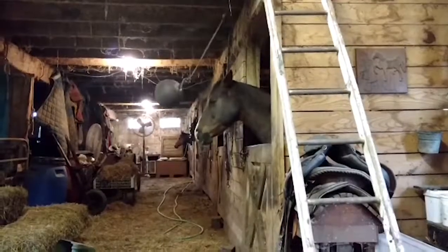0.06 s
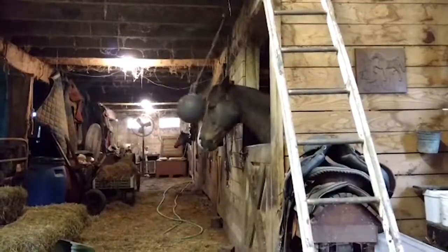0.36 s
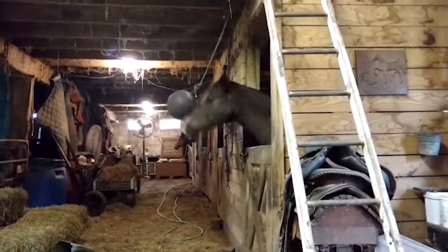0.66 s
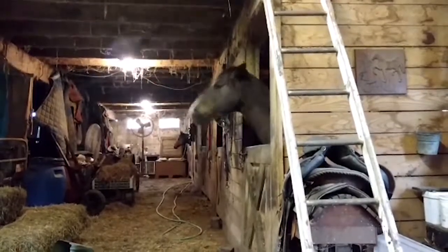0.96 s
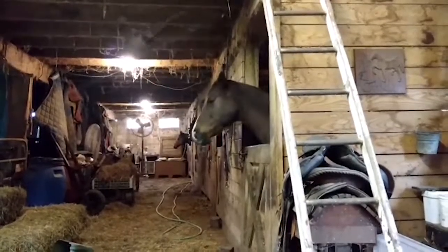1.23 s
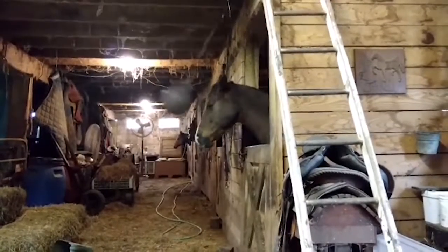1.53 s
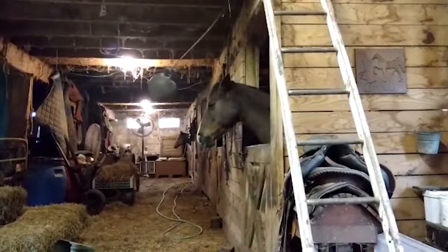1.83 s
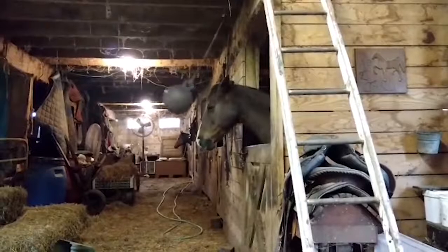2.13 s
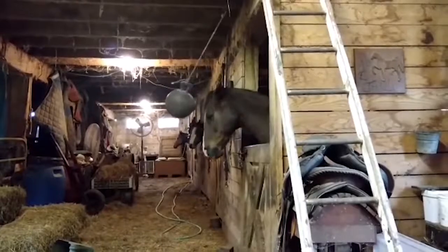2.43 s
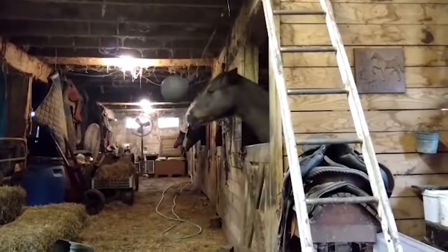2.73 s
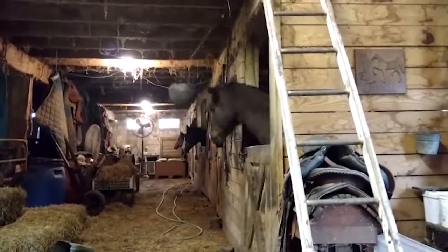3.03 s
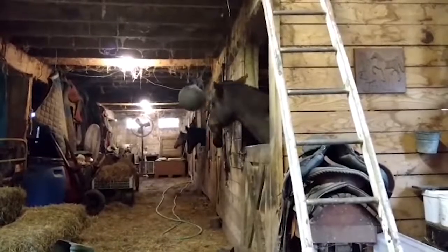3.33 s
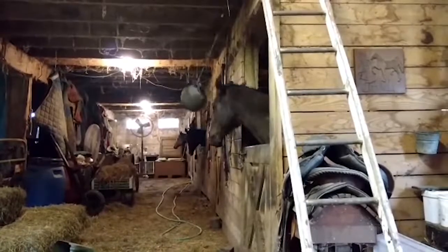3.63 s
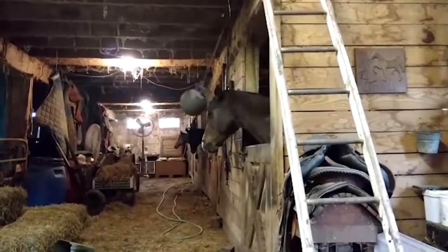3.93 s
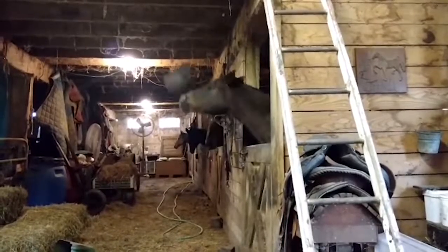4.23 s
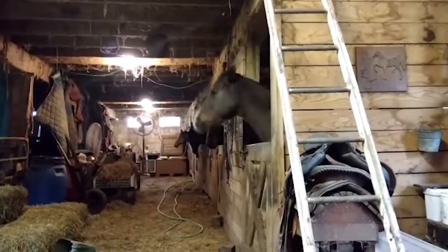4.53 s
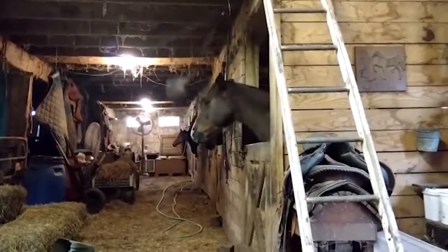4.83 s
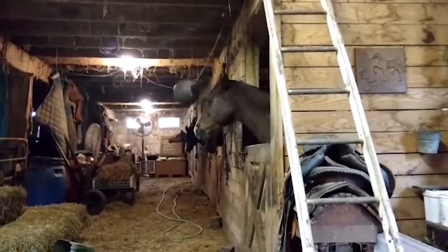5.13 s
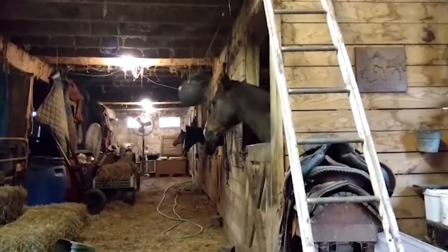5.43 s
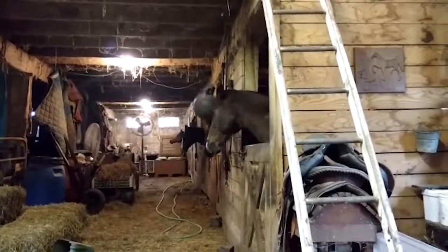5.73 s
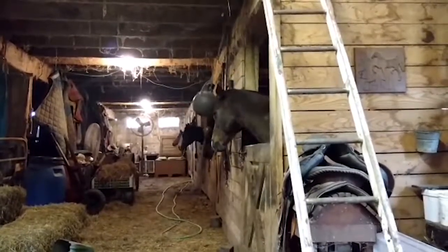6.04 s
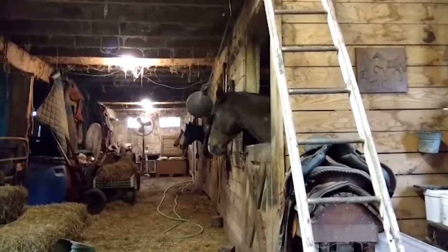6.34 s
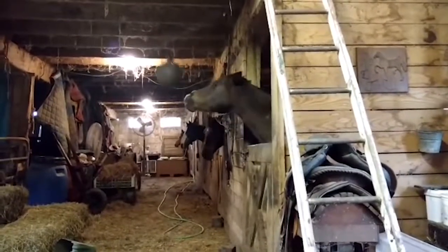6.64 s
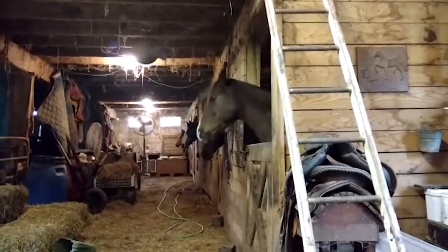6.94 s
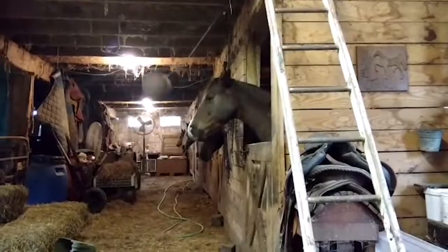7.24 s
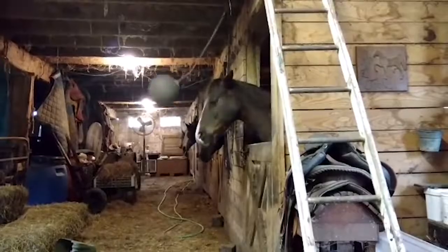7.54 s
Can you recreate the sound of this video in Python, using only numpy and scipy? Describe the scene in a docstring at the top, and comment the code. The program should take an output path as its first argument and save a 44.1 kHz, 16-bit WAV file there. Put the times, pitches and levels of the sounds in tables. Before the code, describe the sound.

Heard on a close stereo pair in the aisle of a wooden barn, uneven knocks ring briefly overhead as a horse swings a hanging ball. After the first few comes a short, loud scuffle of scraping, groaning boards to the right, with a faint metal jingle. More knocks follow, spaced apart, with low hoof steps, halter rubbing, light clacks and crackling straw between them. Soft air noise and a faint hay rustle run underneath.

```python
"""A ball on a ceiling rope, butted by a horse in a wooden barn: the fastening knocks as it swings.
In one loud scuffle the stall boards, off to the right, scrape, crack and groan as the wood sticks
and slips, and the rope's metal clip jingles. Hoof steps and booms after the knocks thud dully, rope
and halter rub, straw snaps, and rope, wood or hoof gives short creaks and clacks.
Heard from the aisle on a close pair of microphones, over a low rush of air."""
import sys
import numpy as np
from scipy import signal
from scipy.fft import rfft, irfft, next_fast_len
from scipy.io import wavfile
from scipy.ndimage import uniform_filter1d

SR = 44100
rng = np.random.default_rng(int(sys.argv[2]) if len(sys.argv) > 2 else 0)


def transcribe(u):
    """Save the signal u as a 16-bit wav file named by the first command-line argument.

    u: samples, shape (n,) or (channels, n), limited to [-1, 1]; the rate is SR.
    q: integer samples, one column per channel.
    """
    v = np.clip(np.atleast_2d(u).T, -1, 1)
    q = np.round(v * 32767).astype(np.int16)
    wavfile.write(sys.argv[1], SR, q)


N = 334278

# knocks overhead, and at 1.3 s a faint sharp knock that opens the scuffle: t/s, direct peak/dB, hardness as a
# corner f/Hz, relative ceiling ring/dB
KNOCKS = [(0.4850, -27, 1750, -10), (0.7725, -16.5, 3230, -4), (1.3, -40, 1500, 0), (1.679, -15, 2630, 0.5),
          (2.4010, -24, 1930, -1.5), (2.8088, -26, 1540, -8.5), (3.4167, -26, 1360, 2),
          (4.0528, -29.5, 1180, 2), (4.471, -14, 4340, 1), (5.355, -12.5, 3630, -10),
          (6.0804, -24, 1740, -2.5), (6.9143, -23, 1430, -2)]
# spectrum of a knock before the contact softens it: f/Hz, level/dB
KNOCK_COLOUR = [(60, -2), (200, -10), (400, 8), (600, 9), (900, 4.5), (1300, 5.5), (1900, -2), (3300, -12),
                (4200, -15.5), (5500, -28), (10000, -45), (16000, -47)]
# reflections off nearby beams and walls: delay/s, gain
ECHOES = [(.0025, 0.46), (.0041, 0.18), (.0092, .14), (0.0172, 0.13)]
# modes of the ceiling: f/Hz, level/dB, t60/s
CEILING_MODES = [(372, -8, 0.55), (485, 0, 0.45), (503, 5, 0.29), (545, -5, 0.81), (592, -1, 0.26),
                 (684, -2.5, 0.53), (945, 1, 0.29), (1380, -11, 0.27), (1700, -44, 0.18), (1750, -1, 0.073),
                 (3230, -14.5, 0.15), (4240, -32, 0.14)]

def fastening_knocks(size=4096):
    """Overhead the fastening slips and hits home: a sharp push, near echoes, then barn and ceiling."""
    out, hz = np.zeros((2, N)), bins(size)
    for s, db, hard_hz, ring_db in KNOCKS:
        treble_cut = (1 + (hz / hard_hz) ** 4) ** -.5
        bass_cut = (hz + 20) / np.hypot(hz + 20, 0.5 * hard_hz)  # a harder contact carries less bass
        log_gain = np.log(from_db(read(KNOCK_COLOUR, hz)) * treble_cut * bass_cut)
        mirrored = np.r_[log_gain, log_gain[-2:0:-1]]
        push = -np.fft.ifft(np.exp(np.conj(signal.hilbert(mirrored)))).real  # causal pulse
        push *= from_db(db) / abs(push).max()
        add(out, s, push)
        for delay, gain in ECHOES:
            add(out, s + delay, gain * push)
        # for its energy, a softer knock stirs the barn more
        stir = np.linalg.norm(push) * from_db(-2 - 3 * np.log2(hard_hz / 2000))
        tail = shaped(barn_tail(), lambda f: 1 / np.hypot(1, f / (0.64 * hard_hz)))
        add(out, s, stir * from_db(5) * tail)
        add(out, s, stir * from_db(ring_db) * ring(CEILING_MODES))
    return out


# modes of the stall boards: f/Hz, width/Hz, level/dB
BOARD_MODES = [(222, 6.5, -11), (252.6, 4.6, -0.5), (389, 13, 3), (418, 15, -2), (504, 32, 4),
               (540, 12, -6), (636, 29, 1), (655, 33, -1), (690, 9.2, 3), (771, 22, -3.5), (957, 39, -4.5),
               (1393, 25, -5), (1600, 19, -19), (1720, 75, -16), (1896, 140, -17)]
# dense wooden body under the modes: f/Hz, level/dB
BOARD_BODY = [(60, -52), (180, -21.5), (300, -13), (500, -5), (900, -9), (1200, -11.5), (1500, -20),
              (2000, -41), (3000, -25.5), (6000, -101), (15000, -66)]
# the stall as the microphones hear it, mostly on the right: f/Hz, left minus right/dB
STALL_SIDE = [(100, 6), (250, -6), (400, -2), (560, -7), (800, -12.5), (1200, 3), (15000, -6)]

def boards(drive):
    """The stall boards ring with whatever drives them, at a steady level."""
    def response(hz):
        modes = sum(from_db(db) ** 2 / (1 + ((hz - f) / (width / 2)) ** 2) ** 2
                    for f, width, db in BOARD_MODES)
        pan = from_db(read(STALL_SIDE, hz) * np.array([[.5], [-.5]]))
        return np.sqrt(modes + from_db(read(BOARD_BODY, hz)) ** 2) * pan
    return steadied(unit(shaped(drive, response)), 0.013)


# shoves along the stall: t/s, rise/s, hold/s, scrape level/dB, grit level/dB
SHOVES = [(1.307, 0.0012, 0.072, -33, -63), (1.421, 0.0086, 0.081, -31.5, -61),
          (1.741, 0.028, 0.22, -33, -64), (1.924, 0.0084, 0.019, -29.5, -38.5)]
# hiss of the grit: f/Hz, level/dB
GRIT_COLOUR = [(400, -20), (1000, 0), (1800, -3), (3300, 16.5), (4500, 10.5), (6500, 2), (8000, -8),
               (8800, 8), (10500, -12), (13000, -12), (15000, -26)]
# blows on the stall: t/s, board level/dB, crack level/dB
BLOWS = [(1.2983, -31, -40.5), (1.325, -31.5, -33), (1.347, -41, -55), (1.402, -34, -45), (1.43, -27, -35),
         (1.486, -33, -42), (1.505, -32, -40), (1.611, -37, -55), (1.704, -32.5, -52), (1.761, -34, -36.5),
         (1.785, -38, -47), (1.837, -37, -40.5), (1.858, -41, -50), (1.871, -29.5, -32), (1.907, -28, -41),
         (1.98, -36, -40)]
# rise and fall of the scuffle's low range: t/s, gain/dB
BOARD_LOWS = [(1.3, 0), (1.52, 5.5), (1.58, -2.5), (1.79, -2.5), (1.88, -2), (1.95, -0.5), (2.0, 1.5)]

def scuffle(scrape_t60=0.73, grit_t60=0.36, lows_below_hz=470):
    """Shoves scrape the boards in small slips over hissing grit; blows land with a dry crack of wood."""
    t = np.arange(N) / SR
    scrape_power, grit_power = np.zeros((2, N))
    for s, rise, hold, scrape_db, grit_db in SHOVES:
        scrape_power += (from_db(scrape_db) * held(t - s, rise, hold, scrape_t60)) ** 2
        grit_power += (from_db(grit_db) * held(t - s, rise, hold, grit_t60)) ** 2
    scrape = boards(0.36 * slips(N, per_s=680, spread_db=1) + noise(N))
    grit = coloured(noise(N) + .5 * slips(N, per_s=2100, spread_db=6.5), GRIT_COLOUR)
    out = np.sqrt(scrape_power) * scrape + np.sqrt(grit_power) * grit
    for s, db, crack_db in BLOWS:
        add(out, s, struck(boards(noise(SR // 3, shared=0.55)), db, rise=0.0011, t60=0.15))
        crack = band(noise(SR // 8, shared=0.16), hz=1350, octaves=0.28)
        add(out, s, struck(steadied(crack, 0.0049), crack_db, rise=0.0011, t60=0.055))
    lows = shaped(out, lambda hz: 1 / (1 + (hz / lows_below_hz) ** 20))
    lows_gain = from_db(np.interp(t, *np.transpose(BOARD_LOWS)))
    return out + lows * (lows_gain - 1)


# groans under the shoves: t/s, length/s, first level/dB, last level/dB, f/Hz, relative lower mode/dB
GROANS = [(1.329, 0.054, -25, -31, 538, -6.5), (1.431, 0.022, -22.5, -20, 557.5, -16),
          (1.462, 0.058, -24.5, -26, 549.6, -18), (1.53, 0.111, -31, -34, 549.6, -21),
          (1.758, 0.031, -26, -25, 565, -32), (1.797, 0.064, -23.5, -23.5, 550, -34),
          (1.857, 0.023, -20, -18, 550, -25), (1.887, 0.0079, -26, -24, 582, -15),
          (1.943, 0.071, -32.5, -31.5, 562.5, -6)]
# the groaning board stands hard right; rows left, right: direct gain/dB
GROAN_SIDE_DB = [
    [-40],
    [1.5],
]

def board_groan(low_mode_hz=410.2, throbs_per_s=27.6, hz_per_db=1.5, room_db=-13):
    """Two board modes sing in throbs as the wood sticks and slips; the upper sags as it weakens."""
    direct, size = np.zeros((1, N)), SR // 2
    t = np.arange(size) / SR
    throb_db = 3.5 * np.cos(2 * np.pi * throbs_per_s * (t - 0.0098))
    def sing(hz):
        wavering_hz = hz * (1 + 0.0368 * drift(size, 88))
        flutter = from_db(2.5 * np.tanh(drift(size, 150)))
        return np.sin(2 * np.pi * np.cumsum(wavering_hz) / SR) * flutter
    for s, length, first_db, last_db, hz, low_db in GROANS:
        db = np.interp(t, [0, length], [first_db, last_db]) + throb_db
        tone = sing(hz + hz_per_db * (db - first_db)) + from_db(low_db) * sing(low_mode_hz)
        envelope = from_db(db) * held(t, rise=0.0017, hold=length, t60=0.058)
        add(direct, s, envelope * steadied(tone[None], 0.024))
    room = signal.fftconvolve(direct, barn_tail(), axes=1)[:, :N]
    return from_db(GROAN_SIDE_DB) * direct + from_db(room_db) * unit(room) * direct.std()


# jerks on the rope's clip: t/s, level/dB, brightness/(dB per octave), relative rattle/dB
JERKS = [(1.315, -58, 4, 0), (1.327, -59, 6, 2), (1.356, -66, 13, 3), (1.933, -43, -12, 13),
         (1.953, -49, -0.5, 5)]
CLIP_MODES = [(3060, 6.5, 0.29), (3500, -2, 0.33), (3645, 2.5, 0.44), (3740, -11, 0.26), (4150, -3, 0.28),
              (4630, 9.5, 0.29), (5510, -13, 0.15), (6290, 3, 0.38), (6420, -6, 0.23), (8690, 0.5, 0.22),
              (9100, -14, 0.25), (10440, -4, 0.3), (11000, -25, 0.24), (12930, -19, 0.23)]

def metal_clip():
    out = np.zeros((2, N))
    for s, db, tilt_db, rattle_db in JERKS:
        jingle = ring(CLIP_MODES, tilt_db)
        jingle *= .6 + drift(jingle.shape[1], 190)
        add(out, s, from_db(db) * jingle / jingle[:, :SR // 50].std())
        contacts = noise(SR // 8, shared=0.48) + slips(SR // 8, per_s=850, spread_db=5.5)
        links = band(contacts, hz=4470 * 2 ** (tilt_db / 14), octaves=0.62)
        add(out, s, struck(unit(links), db + rattle_db, rise=0.0011, t60=0.051))
    return out


# hoof steps, and booms that follow the overhead knocks: t/s, level/dB, t60/s
THUDS = [(2.19, -45, 0.6), (2.813, -40.5, 0.13), (3.222, -41.5, 0.11), (3.431, -41.5, 0.44),
         (3.455, -38, 0.56), (3.983, -50.5, 0.56), (5.0, -51, 0.61), (5.356, -41, 0.18), (5.835, -46, 0.73),
         (5.904, -40, 0.089), (6.405, -47, 0.97), (6.99, -45, 0.63)]
# spectrum of a thud: f/Hz, level/dB
THUD_COLOUR = [(50, -42), (150, -5.5), (280, 5), (500, 1.5), (800, -4.5), (1400, -16.5), (2500, -28),
               (8000, -27), (15000, -53)]

def low_thuds(size=SR // 2, rise_s=0.0054):
    """Dull low thuds, each over a short deep note: hoof steps, and booms after the overhead knocks."""
    out = np.zeros((2, N))
    for s, db, t60 in THUDS:
        thud = steadied(coloured(noise(size, shared=0.6), THUD_COLOUR), 0.014)
        add(out, s, struck(thud, db, rise_s, t60))
        boom = unit(band(noise(size, shared=0.21), hz=97, octaves=0.065))
        add(out, s, struck(boom, db - 8.5, rise_s, t60=0.097))
    return out


# strokes of rope and halter: t/s, level/dB, hold/s, t60/s, rasp f/Hz
RUBS = [(1.326, -45, 0.003, 0.19, 1000), (1.429, -32, 0.003, 0.07, 1400), (1.928, -34, 0.003, 0.35, 1700),
        (3.54, -54, 0.003, 0.19, 1200), (4.007, -55, 0.05, 0.15, 900), (5.907, -52, 0.003, 0.085, 900),
        (7.325, -51, 0.016, 0.11, 935), (7.356, -50, 0.038, 0.3, 1170), (7.462, -53.5, 0.012, 0.19, 1400),
        (7.516, -46.5, 0.016, 0.11, 1200)]
# spectrum of the rubbing: f/Hz, level/dB
RUB_COLOUR = [(100, -3), (500, 13.5), (1200, 7.5), (1900, 9), (3400, -1.5), (5500, -8), (9000, -12),
              (15000, -44)]

def halter_rubs(size=SR // 2):
    """Rope and halter rub in grainy strokes, each rasping in one band."""
    out, t = np.zeros((2, N)), np.arange(size) / SR
    for s, db, hold, t60, hz in RUBS:
        grains = noise(size, shared=.3) + slips(size, per_s=350, spread_db=3)
        rasp = shaped(grains, lambda f: 1 + from_db(0.5) * bell(f, hz, octaves=0.31))
        add(out, s, from_db(db) * held(t, 0.0051, hold, t60) * coloured(rasp, RUB_COLOUR))
    return out


# small creaks and clacks in the barn: t/s, rough peak/dB, f/Hz, t60/s
CREAKS_AND_CLACKS = [(0.276, -52, 1860, 0.021), (2.129, -42, 3150, 0.02), (3.983, -41, 790, 0.036),
                     (4.445, -52, 3880, 0.016), (4.567, -50, 3570, 0.025), (4.666, -46.5, 2080, 0.036),
                     (5.071, -46, 2960, 0.028), (5.909, -44, 860, 0.03), (7.105, -48, 2850, 0.03),
                     (7.359, -42.5, 1160, 0.09), (7.467, -54, 3330, 0.03)]

def creaks_and_clacks():
    """Short narrow-band creaks and clacks of rope, wood or hoof."""
    out = np.zeros((2, N))
    for s, db, hz, t60 in CREAKS_AND_CLACKS:
        add(out, s, snap(db, hz, octaves=0.13, t60=t60, room_db=-18))
    return out


# loudest snaps of straw underfoot: t/s, rough peak/dB, centre f/Hz, t60/s
SNAPS = [(0.068, -49.5, 6500, 0.018), (1.511, -42, 4780, 0.031), (1.623, -41.5, 9400, 0.014),
         (1.69, -44.5, 8500, 0.033), (1.827, -47, 10000, 0.0083), (2.1285, -42, 4700, 0.013),
         (2.3258, -50, 5340, 0.016), (2.392, -42.5, 5840, 0.008), (2.996, -48, 4520, 0.018),
         (3.166, -48, 4200, 0.018), (3.197, -55, 4200, 0.015), (3.582, -48, 5100, 0.01),
         (3.7555, -48.5, 7500, 0.009), (3.879, -55, 6000, 0.013), (4.1195, -49, 8000, 0.016),
         (4.183, -47, 8500, 0.01), (4.258, -54, 7000, 0.014), (5.009, -46.5, 6000, 0.022),
         (5.027, -56, 6000, 0.012), (5.175, -57, 6000, 0.012), (5.211, -52, 6800, 0.017),
         (5.326, -50, 6000, 0.0076), (5.575, -46.5, 3620, 0.022), (5.743, -44.5, 7700, 0.015),
         (5.777, -47, 8060, 0.015), (6.362, -46.5, 7000, 0.014), (6.558, -45.5, 3570, 0.073),
         (6.926, -45.5, 7400, 0.025), (7.067, -50, 8000, 0.013), (7.3388, -46.5, 3780, 0.025),
         (7.445, -57, 5800, 0.018)]
# scuffs through the straw: t/s, level/dB, length/s, centre f/Hz
SCUFFS = [(0.735, -59, 0.018, 5000), (1.07, -67, 0.02, 4500), (2.405, -56, 0.026, 7750),
          (2.512, -55, 0.014, 5000), (2.82, -52.5, 0.023, 4850), (3.81, -56, 0.018, 7900),
          (4.737, -55, 0.011, 7500), (5.975, -56, 0.016, 4660), (6.435, -56, 0.027, 3880),
          (6.81, -63, 0.039, 6450)]

def straw(crackles=150, top_hz=11200):
    """On the stall floor stalks snap and slide over each other in tiny clicks, above a fine crackle."""
    out, t = np.zeros((2, N)), np.arange(SR // 4) / SR
    for s, db, hz, t60 in SNAPS:
        add(out, s + .001, snap(db, hz, octaves=0.86, t60=t60, room_db=-24))
    for s, db, length, hz in SCUFFS:
        grains = .6 * noise(len(t)) + slips(len(t), per_s=900, spread_db=3)
        envelope = from_db(db) * held(t, rise=0.005, hold=length, t60=0.12)
        add(out, s, envelope * unit(band(grains, hz, octaves=0.68)))
    for when, strength, pitch in rng.random((crackles, 3)):
        db, hz = -63 + 9 * strength ** 3, 3000 * 3.5 ** pitch
        add(out, when * N / SR, snap(db, hz, octaves=0.35, t60=0.016, room_db=-22))
    return shaped(out, lambda hz: 1 / np.hypot(1, (hz / top_hz) ** 4))


# spectrum of the hay: f/Hz, level/dB
RUSTLE_COLOUR = [(300, -10), (1800, -16), (3000, 19), (5200, 13), (6800, 12.5), (8500, 4.5), (10500, 7.5),
                 (12500, -16), (14000, -2), (15500, -15)]
# the horse stirs the hay: middle t/s, half length/s, gain/dB
STIRS = [(6.508, 0.23, 3), (7.42, 0.2, 5)]

def hay_rustle(base_db=-63, flicker_db=1.7):
    """Hay rustles unevenly, swelling where the horse stirs it."""
    grains = noise(N) + .55 * slips(N, per_s=400, spread_db=4)
    stir_db = sum(swell_db(*stir) for stir in STIRS)
    return coloured(grains, RUSTLE_COLOUR) * from_db(base_db + stir_db + flicker_db * drift(N, 4.2))


# air in the aisle, around the microphones: f/Hz, level/dB
AIR_COLOUR = [(20, -43), (45, -19.5), (65, -46), (90, -12.5), (130, 0), (180, 2), (250, -3.5), (310, -4),
              (370, -10), (490, -5), (900, -7.5), (1400, -12), (2000, -16), (3300, -38.5), (9000, -22.5),
              (12000, -33.5), (15500, -38)]
# the low draught: f/Hz, level/dB
DRAUGHT_COLOUR = [(20, -30), (45, -25), (65, -3), (100, 7.5), (130, 0.5), (200, -22), (500, -47)]

def aisle_air():
    """Air rushes softly through the barn; a low draught, stronger on the left, swells in one gust."""
    rush = coloured(noise(N), AIR_COLOUR) * from_db(-53 + .5 * drift(N, 5.9))
    draught = coloured(noise(N), DRAUGHT_COLOUR)
    draught_db = -67.5 + swell_db(middle_s=3, half_s=0.41, db=6.9) + 2.8 * drift(N, 8.3)
    side_db = np.array([[2.5], [-1.5]])
    return rush + draught * from_db(draught_db + side_db)


# tone of the barn's reverberation: f/Hz, level/dB
BARN_COLOUR = [(60, -22), (130, -12), (400, -9), (520, 4), (650, 0.5), (800, -5), (1000, -1), (1400, -10.5),
               (1900, -8.5), (3500, -16.5), (6000, -21), (15000, -28)]
# its decay: f/Hz, t60/s
BARN_DECAY = [(200, 0.7), (530, 0.56), (1400, 0.48), (3700, 0.44), (12000, 0.18)]

def barn_tail():
    """Diffuse reverberation of the wooden barn, of energy 1, the treble dying first."""
    hz, frame_s, spectra = signal.stft(noise(SR * 3 // 4, shared=0.35), SR, nperseg=256)
    decay = from_db(-60 * frame_s / read(BARN_DECAY, hz)[:, None])
    tail = signal.istft(spectra * decay, SR, nperseg=256)[1]
    t = np.arange(tail.shape[1]) / SR
    tail = coloured(tail, BARN_COLOUR) * (1 - np.exp(-(t / 0.0013) ** 2))
    return tail / np.sqrt((tail ** 2).sum() / 2)


def ring(modes, tilt_db=0, vary_db=2):
    """Dying modes of energy 1, tilted per octave, varying by blow and in phase at each microphone."""
    t, sound = np.arange(SR * 3 // 4) / SR, 0
    for hz, db, t60 in modes:
        cycles = hz * t + rng.random() + 0.31 * rng.random((2, 1))
        mode_db = db + tilt_db * np.log2(hz) + vary_db * rng.standard_normal()
        sound += struck(np.sin(2 * np.pi * cycles), mode_db, 0.0013, t60)
    return sound / np.sqrt((sound ** 2).sum() / 2)


def snap(db, hz, octaves, t60, room_db):
    """A brief burst around one pitch, with a faint tail; db is about its peak."""
    hiss = steadied(band(noise(SR // 3, shared=0.65), hz, octaves), 0.0033)
    burst = struck(hiss, 0, rise=0.00077, t60=t60)
    tail = struck(hiss, room_db, rise=0.0073, t60=0.41)
    rough_peak = 2 * burst.mean(0)[:SR // 200].std()
    return (burst + tail) * from_db(db) / rough_peak


def slips(size, per_s, spread_db):
    """Random small slips of uneven strength."""
    chance, strength = rng.random(size), np.minimum(rng.exponential(1, size), 4)
    return unit((chance < per_s / SR) * from_db(spread_db * strength) * rng.choice([-1, 1], size))


def noise(size, shared=0):
    """Two channels of noise with a common share of their power."""
    left, right, common = rng.standard_normal((3, size))
    return np.sqrt(1 - shared) * np.array([left, right]) + np.sqrt(shared) * common


def drift(size, hz):
    """Random wander of rms 1, mostly slower than hz."""
    return unit(shaped(rng.standard_normal(size), lambda f: np.exp(-(f / hz) ** 2)))


def swell_db(middle_s, half_s, db):
    """A bell-shaped rise and fall in level."""
    return db * np.exp(-((np.arange(N) / SR - middle_s) / half_s) ** 2)


def held(t, rise, hold, t60):
    """Gain of a stroke that starts at t = 0: a rise, a hold and an exponential release."""
    return (1 - np.exp(-np.maximum(t, 0) / rise)) * from_db(-60 * np.maximum(t - hold, 0) / t60)


def struck(x, db, rise, t60):
    """Gives x a quick rise and an exponential decay."""
    return x * from_db(db) * held(np.arange(x.shape[-1]) / SR, rise, 0, t60)


def steadied(x, seconds):
    """Holds the short-time rms at 1."""
    power = uniform_filter1d((x ** 2).mean(0), int(seconds * SR))
    return x / np.sqrt(abs(power) + 1e-12)


def shaped(x, gain):
    """Filters by a function from Hz to gain."""
    size = next_fast_len(x.shape[-1] + 2048)
    return irfft(rfft(x, size) * gain(bins(size)), size)[..., :x.shape[-1]]


def coloured(x, colour):
    """Filters by a table of f/Hz, level/dB, to rms 1."""
    return unit(shaped(x, lambda hz: from_db(read(colour, hz))))


def band(x, hz, octaves):
    """Keeps a bell-shaped band around hz."""
    return shaped(x, lambda f: bell(f, hz, octaves))


def bell(f, hz, octaves):
    """Gain of a bell-shaped band around hz."""
    return np.exp(-.5 * (np.log2((f + 1) / hz) / octaves) ** 2)


def bins(size):
    """Frequencies of a spectrum of this many samples."""
    return np.fft.rfftfreq(size, 1 / SR)


def read(points, hz):
    """Reads a table on a log-frequency axis."""
    f, value = np.transpose(points)
    return np.interp(np.log(hz + 1), np.log(f + 1), value)


def from_db(db):
    """Decibels to gain."""
    return 10 ** (np.asarray(db) / 20)


def unit(x):
    """Scales to rms 1."""
    return x / np.sqrt(np.mean(x ** 2) + 1e-20)


def add(mix, s, sound):
    """Mixes a sound in at time s."""
    part = mix[:, max(round(s * SR), 0):][:, :sound.shape[-1]]
    part += sound[..., :part.shape[1]]


def scene():
    """The barn from the aisle; the background starts softer and comes up within the first second."""
    events = fastening_knocks() + scuffle() + metal_clip() + board_groan()
    events += low_thuds() + halter_rubs() + creaks_and_clacks() + straw()
    t = np.arange(N) / SR
    fade_in = from_db(-4.5 * np.maximum(1 - (t / 0.71) ** 2, 0))
    return events + (aisle_air() + hay_rustle()) * fade_in


# stereo width of the microphone pair: f/Hz, side gain/dB
PAIR_WIDTH = [(40, 8), (90, 4.5), (180, -4), (500, -1), (1000, 0.5), (1500, 2.5), (4000, 3.5), (15000, 0)]
PAIR_NULL_HZ, BAND_LIMIT_HZ = 2472, 15800

def record(dry):
    """The close pair: each port subtracts the other, delayed, so mid and side get interleaved combs."""
    angle = lambda hz: np.pi * hz / PAIR_NULL_HZ
    leak = lambda hz: np.minimum(from_db(-27) * (hz / 6000) ** 4, .7)  # fills the nulls in the treble
    mid_comb = lambda hz: np.hypot(np.sin(np.maximum(angle(hz), np.pi / 2)), leak(hz))
    side_comb = lambda hz: np.hypot(np.cos(angle(hz)), leak(hz))
    mid = shaped((dry[0] + dry[1]) / 2, mid_comb)
    side = shaped((dry[0] - dry[1]) / 2, lambda hz: side_comb(hz) * from_db(read(PAIR_WIDTH, hz)))
    low_pass = signal.firwin(511, BAND_LIMIT_HZ, window=("kaiser", 9), fs=SR)
    return signal.oaconvolve(np.array([mid + side, mid - side]), low_pass[None], "same", axes=1)


dry = scene()
out = record(dry)
transcribe(out)
```